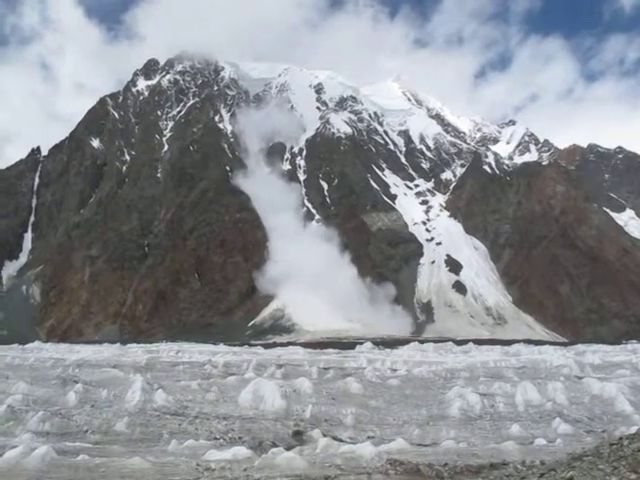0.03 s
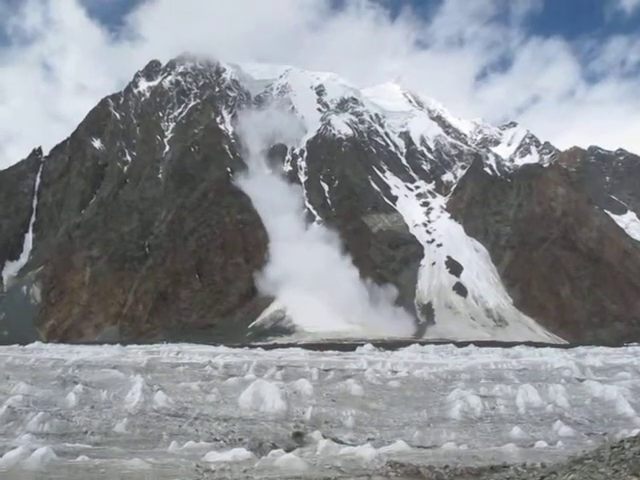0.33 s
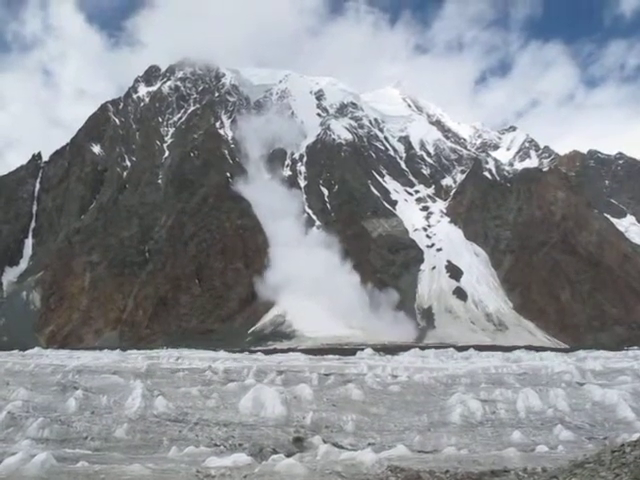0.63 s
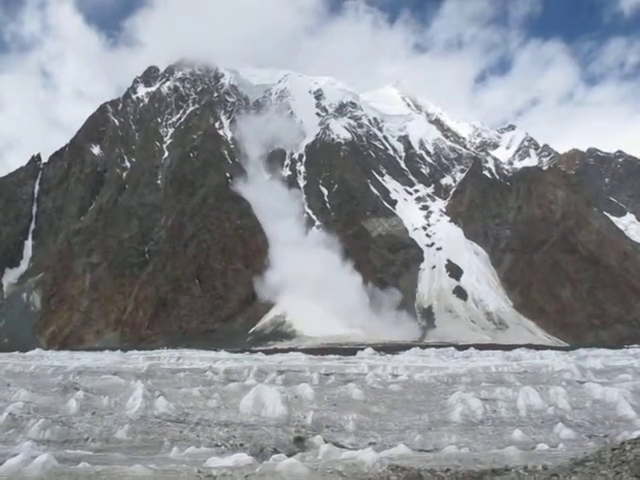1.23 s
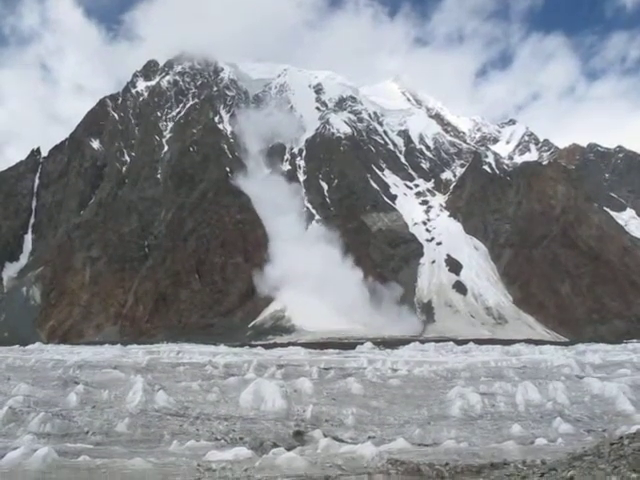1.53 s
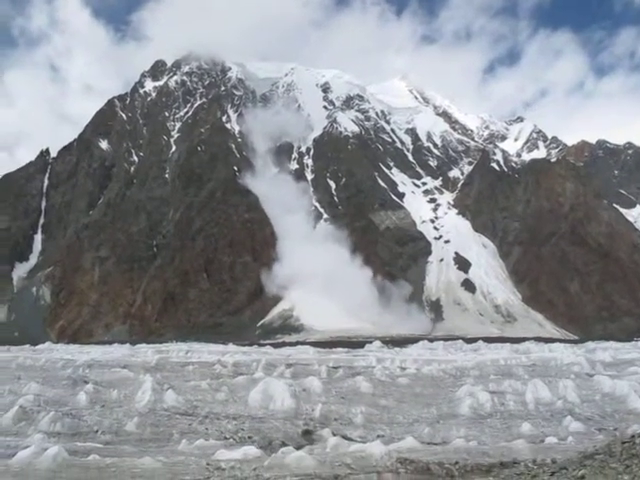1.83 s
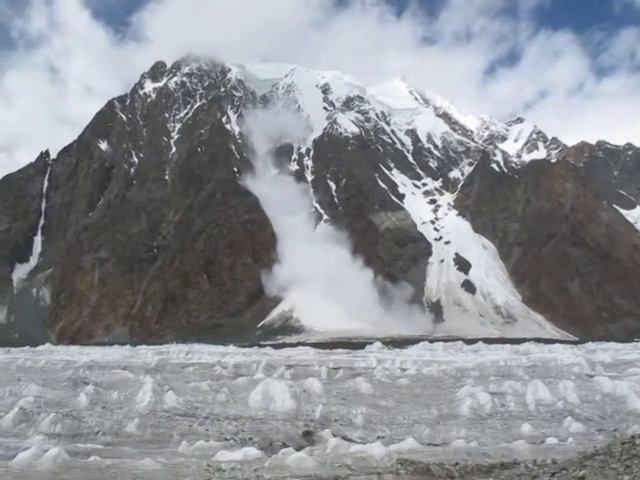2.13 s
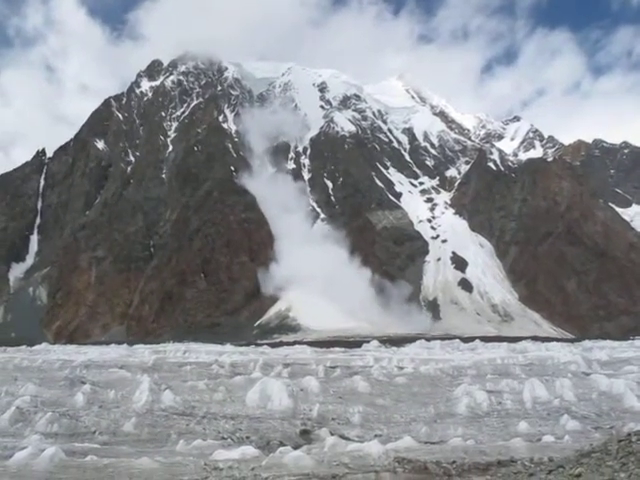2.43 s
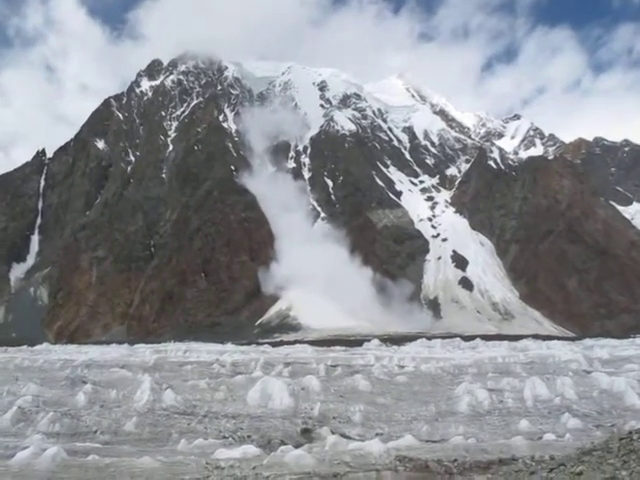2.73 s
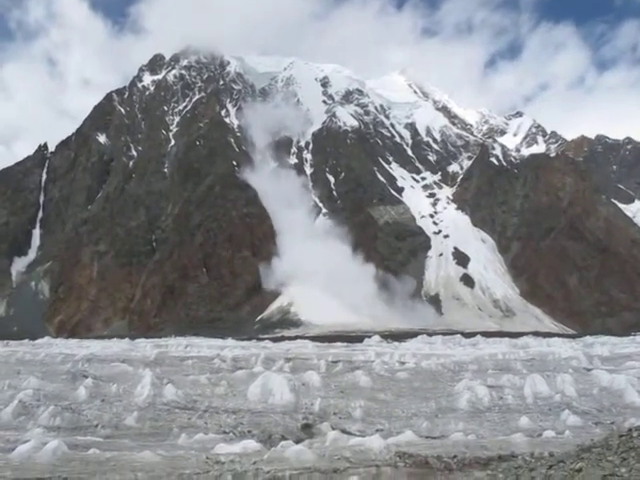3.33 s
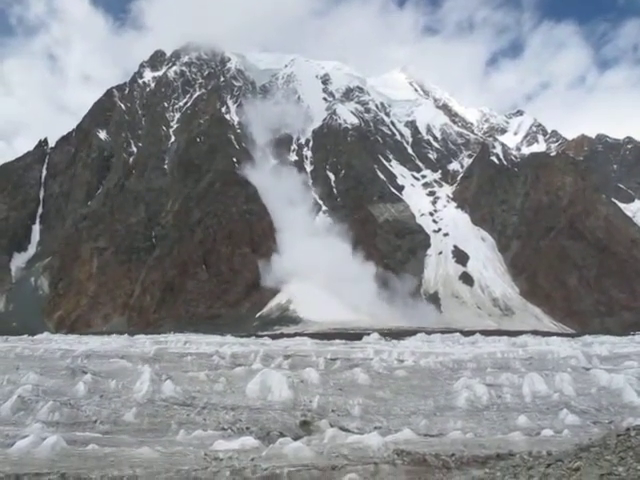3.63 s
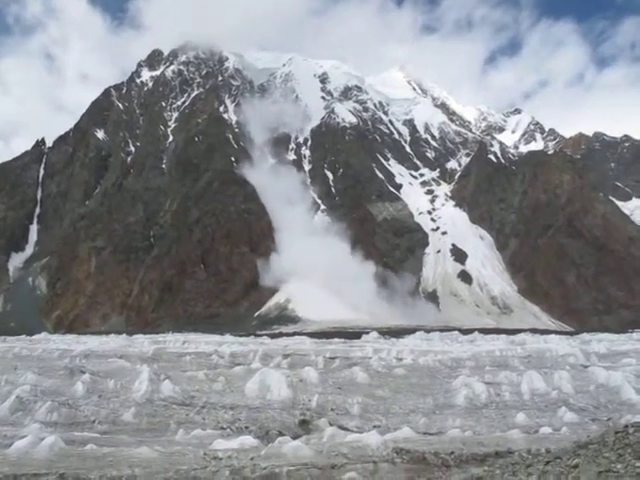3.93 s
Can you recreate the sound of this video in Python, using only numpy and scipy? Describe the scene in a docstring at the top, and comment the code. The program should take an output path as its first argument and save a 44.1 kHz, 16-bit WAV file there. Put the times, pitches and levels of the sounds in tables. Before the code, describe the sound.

Wind pushes on the microphone in a deep, uneven rumble, with flutters, soft thumps and brief puffs. Far across a glacier, an avalanche makes a faint, dull, even roar, and a thin hiss of air lies above.

```python
"""First you hear a deep, lumpy rumble: gusts of wind pushing on the microphone.
Small eddies (swirls of air) flutter on top, a few strong ones thump, and brief puffs rasp past.
Behind the wind, all the way through, an avalanche pours down a mountain far across a glacier;
distance smooths its tumbling snow and ice into a dull, even roar.
A faint hiss of moving air lies above it all."""
import sys
import numpy as np
from scipy import signal
from scipy.fft import rfft, irfft
from scipy.io import wavfile
from scipy.ndimage import uniform_filter1d, map_coordinates

SR = 44100
rng = np.random.default_rng(int(sys.argv[2]) if len(sys.argv) > 2 else 0)


def put_to_file(sound):
    """Save the sound as 16-bit audio at rate SR, in the file named by the first command-line argument."""
    columns = np.atleast_2d(sound).T  # one column per channel
    safe = np.clip(columns, -1, 1)
    whole_steps = np.round(safe * 32767)
    wavfile.write(sys.argv[1], SR, whole_steps.astype(np.int16))


N = 176400   # 4 seconds
TIME = np.arange(N) / SR
FREQUENCIES = np.arange(N // 2 + 1) * SR / N


def from_db(db):
    """Turn decibels into a number to multiply a sound by."""
    return 10 ** (np.asarray(db) / 20)


def unit_level(x):
    """Scale a signal so that its average power is 1."""
    return x / np.sqrt(np.mean(x ** 2) + 1e-20)


def over_time(rows):
    """Join (seconds, value) points with straight lines, giving a value for every sample."""
    return np.interp(TIME, *np.transpose(rows))


def with_tone(x, tone):
    """Shape a sound's lows and highs by (Hz, dB) points, fading away beyond both ends."""
    hz, db = np.transpose(tone)
    f = np.maximum(FREQUENCIES, 1)
    curve = from_db(np.interp(np.log(f), np.log(hz), db))
    end_fades = 1 / np.sqrt((1 + (f / (2 * hz[-1])) ** 4) * (1 + (.5 * hz[0] / f) ** 4))
    return unit_level(irfft(rfft(x) * end_fades * curve, N))


def drift(rate_hz):
    """A smooth random wander, typically about 1 either side of zero."""
    return unit_level(irfft(rfft(rng.standard_normal(N)) / (1 + (FREQUENCIES / rate_hz) ** 2), N))


def steadied(x, share, window_s=0.068):
    """Even out a noise's slow swings in loudness: share 0 leaves them, 1 takes out the most."""
    size = int(window_s * SR)
    power = uniform_filter1d(uniform_filter1d(x ** 2, size), size)
    return unit_level(x / (power + 1e-9) ** (share / 2))


# How hard the gusts blow. Each row: time in seconds, relative level in dB.
GUST_LEVELS = [(0.03, -17.5), (0.14, -19.5), (0.33, -27), (0.46, -17), (0.515, -23), (0.59, -14),
               (0.75, -16), (0.8, -21), (0.87, -15), (0.94, -25), (1.06, -18), (1.22, -16.5), (1.28, -21.5),
               (1.45, -18.5), (1.55, -20.5), (1.79, -17), (2.24, -20), (2.4, -23), (2.55, -20.5),
               (2.77, -23.5), (2.95, -15), (3.16, -19), (3.38, -14.5), (3.43, -20.5), (3.97, -22)]
# The rumble's tone in an average gust. Each row: frequency in Hz, relative level in dB.
RUMBLE_TONE = [(10, 1), (24, 1), (45, 1), (68, 1), (110, -5.5), (170, -11.5), (250, -24.5), (500, -67.5)]

def wind_rumble(gain_db=-1.5, octaves_per_db=0.057, surge_db=1.0):
    """Large eddies push on the microphone: loud and fast in a gust, slow and dull in a lull."""
    gust_db = over_time(GUST_LEVELS)
    speed = 2 ** (octaves_per_db * (gust_db - gust_db.mean()))
    eddies = steadied(with_tone(rng.standard_normal(N), RUMBLE_TONE), share=0.55)
    # A stronger gust sweeps the eddies past faster, so step through the noise faster.
    pressure = map_coordinates(eddies, [np.cumsum(speed)], order=3, mode="mirror")
    surges = from_db(surge_db * drift(rate_hz=14))
    return from_db(gust_db + gain_db) * steadied(pressure * surges, share=0.96)


# How loud the flutter is. Each row: time in seconds, relative level in dB.
FLUTTER_LEVELS = [(0.03, -42.5), (0.28, -51), (0.47, -34.5), (0.52, -36.5), (0.63, -31.5), (0.7, -35),
                  (0.88, -30.5), (0.95, -38), (1.3, -32), (1.51, -35.5), (1.72, -34), (2.07, -35),
                  (2.27, -35), (2.39, -44), (2.5, -38), (2.8, -44), (3.02, -36), (3.18, -40.5),
                  (3.37, -29.5), (3.45, -36), (3.85, -41.5), (3.97, -37)]
# The flutter's tone. Each row: frequency in Hz, relative level in dB.
FLUTTER_TONE = [(70, -10.5), (130, 0), (200, -1.5), (260, -6), (335, -8), (450, -18.5), (700, -27.5),
                (1300, -53.5), (3000, -75)]

def wind_flutter(gain_db=3.5, eddies_per_s=450, spread_db=4):
    """Small eddies arrive at random, each a soft push or pull of a different size."""
    sizes = from_db(spread_db * np.minimum(rng.exponential(1, N), 4))
    directions = rng.choice([-1, 1], N)
    arrivals = rng.random(N) < eddies_per_s / SR
    flutter = with_tone(sizes * directions * arrivals, FLUTTER_TONE)
    return from_db(over_time(FLUTTER_LEVELS) + gain_db) * steadied(flutter, share=0.5)


# How loud the far roar is. Each row: time in seconds, relative level in dB.
ROAR_LEVELS = [(0.03, -53), (0.04, -52.5), (0.48, -49.5), (0.99, -56), (1.2, -56), (1.36, -55.5),
               (1.5, -53), (2.3, -57.5), (2.51, -52.5), (2.8, -55.5), (3.38, -52), (3.73, -56),
               (3.97, -53.5)]
# The roar's tone. Each row: frequency in Hz, relative level in dB.
ROAR_TONE = [(150, 8.5), (350, 0.5), (560, 5), (680, 0), (770, 4.5), (1000, -2), (1240, -4.5),
             (1310, -14.5), (1420, -13.5), (1475, -4.5), (1560, -12.5), (2100, -20), (3500, -28)]

def avalanche(gain_db=6.5, churn_db=1.0):
    """Tumbling snow and ice make a roar, smoothed and dulled by distance."""
    roar = with_tone(rng.standard_normal(N), ROAR_TONE)
    level_db = over_time(ROAR_LEVELS) + gain_db + churn_db * drift(rate_hz=10)
    return from_db(level_db) * roar


def shimmer(x, depth_db, rate_hz, size=2048):
    """Split a noise into narrow frequency bands and let them slowly swell and fade at random."""
    _, times, bands = signal.stft(x, SR, nperseg=size)
    memory = np.exp(-2 * np.pi * rate_hz * times[1])
    nudges = rng.standard_normal((len(bands), 2 * len(times)))
    wander = signal.lfilter([1], [1, -memory], nudges)[:, len(times):]   # keep the settled half
    wander = unit_level(uniform_filter1d(wander, size=4, axis=0))   # nearby bands move together
    _, shimmering = signal.istft(bands * from_db(depth_db * wander), SR, nperseg=size)
    return unit_level(shimmering[:N])


def resonance(x, hz, width_hz):
    """Bring out a band of sound around one frequency."""
    r = np.exp(-np.pi * width_hz / SR)
    return signal.lfilter([1, 0, -1], [1, -2 * r * np.cos(2 * np.pi * hz / SR), r * r], x)


# How loud the hiss is. Each row: time in seconds, level in dB.
HISS_LEVELS = [(0.03, -59.5), (0.3, -58), (0.55, -59.5), (0.85, -62.5), (1.3, -64), (1.91, -62.5),
               (2.16, -65), (2.47, -61.5), (3.32, -61), (3.72, -64), (3.97, -60.5)]
# The hiss's tone. Each row: frequency in Hz, relative level in dB.
HISS_TONE = [(1200, -9), (2300, -5), (3600, -3), (4500, 2), (5200, -3), (6400, -2), (7400, 4), (8100, -1.5),
             (9150, -0.5), (9800, 1), (10500, -9), (12000, -16), (15500, -35)]
# Faint ringing in the hiss. Each row: frequency in Hz, width in Hz, level in dB relative to the hiss.
HISS_RESONANCES = [(1997, 60, -17), (2670, 130, -14), (3280, 57, -14.5), (3900, 66, -15.5), (4230, 98, -17),
                   (4590, 150, -17.5), (6210, 110, -23.5), (7340, 99, -16), (7540, 200, -13.5),
                   (8500, 76, -23)]

def wind_hiss(flicker_db=0.6):
    """Moving air makes a thin, shimmering hiss, tinted by faint resonances."""
    hiss = with_tone(rng.standard_normal(N), HISS_TONE)
    for hz, width_hz, db in HISS_RESONANCES:
        hiss += from_db(db) * unit_level(resonance(rng.standard_normal(N), hz, width_hz))
    level_db = over_time(HISS_LEVELS) + flicker_db * drift(rate_hz=20)
    return from_db(level_db) * shimmer(hiss, depth_db=3.6, rate_hz=1.0)


# Strong eddies that hit the microphone.
# Each row: middle time in seconds, strength (below zero pulls), rough half width in seconds.
STRONG_EDDIES = [(0.053, -.3, 0.0039), (0.4687, 0.68, 0.006), (0.4849, -0.54, 0.0021),
                 (0.5598, .58, 0.0038), (0.5958, 0.45, 0.0037), (.619, 0.78, 0.0029),
                 (0.7535, 0.78, 0.0033), (0.764, 0.46, 0.0017), (0.8361, 0.72, 0.003),
                 (0.882, -0.52, 0.0017), (1.0728, 0.39, 0.0022), (1.14, 0.53, 0.0033),
                 (1.2484, 0.55, 0.0027), (1.2753, -0.18, 0.00095), (1.323, -0.52, 0.0034),
                 (1.374, 0.54, 0.0027), (1.4153, -0.48, 0.0028), (1.5684, -0.14, 0.00085),
                 (1.5933, 0.62, 0.003), (1.6766, -.2, .001), (1.732, 0.64, 0.0018), (1.764, -0.61, 0.0024),
                 (1.916, 0.44, 0.0018), (1.9508, 0.34, .0023), (1.987, 0.44, 0.0017),
                 (2.0292, 0.71, 0.0044), (2.195, 0.44, 0.0029), (2.2732, -0.34, .0017),
                 (2.7108, -0.46, 0.0028), (2.9356, 0.33, 0.0067), (3.23, 0.41, 0.0027),
                 (3.259, -0.42, 0.0023), (3.297, 0.25, .002), (3.389, -0.59, .0036), (3.4669, 0.39, .001),
                 (3.6056, -0.39, 0.0038), (3.9008, 0.36, 0.0063)]

def wind_thumps(rebound_stretch=3.4):
    """Each strong eddy is one rounded push, with a wider, shallower swing the other way."""
    thumps = np.zeros(N)
    for middle_s, strength, half_width_s in STRONG_EDDIES:
        offset = (TIME - middle_s) / half_width_s
        push = (1 + offset ** 2) ** -2
        rebound = (1 + (offset / rebound_stretch) ** 2) ** -2 / rebound_stretch
        thumps += strength * (push - rebound)
    return thumps


def dips_at_thumps(depth=0.45, half_width_s=0.006):
    """A volume curve that dips briefly as each strong eddy sweeps the others aside."""
    dips = [np.exp(-.5 * ((TIME - middle_s) / half_width_s) ** 2) for middle_s, _, _ in STRONG_EDDIES]
    return 1 - depth * np.max(dips, axis=0)


# Short puffs of finely swirling air.
# Each row: middle time in seconds, rough half length in seconds, centre frequency in Hz, level in dB.
AIR_PUFFS = [(0.218, 0.022, 335, -41), (1.118, 0.013, 330, -33), (1.348, 0.03, 364, -34.5),
             (2.166, 0.013, 310, -39.5), (2.504, 0.018, 267, -31), (3.739, 0.038, 320, -39.5)]

def wind_puffs(width_share=0.44):
    """Puffs rasp across the microphone, each a soft band of noise that swells and fades."""
    puffs = np.zeros(N)
    for middle_s, half_length_s, hz, db in AIR_PUFFS:
        band = resonance(rng.standard_normal(N), hz, width_share * hz)
        band = resonance(band, hz, width_share * hz)   # twice, for steeper edges
        swell = np.exp(-.5 * ((TIME - middle_s) / half_length_s) ** 2)
        puffs += from_db(db) * swell * steadied(band, share=0.41)
    return puffs


def scene():
    """Mix the far roar and the nearby wind into one channel."""
    roar = avalanche()
    buffeting = dips_at_thumps() * (wind_rumble() + wind_flutter()) + wind_thumps()
    return (roar + buffeting + wind_hiss() + wind_puffs())[None]


def record(dry):
    """Cut the very highest treble: at least 70 dB quieter from 16642 Hz up."""
    return signal.sosfilt(signal.cheby2(12, 70, 16642, fs=SR, output="sos"), dry)


dry = scene()
out = record(dry)
put_to_file(out)
```